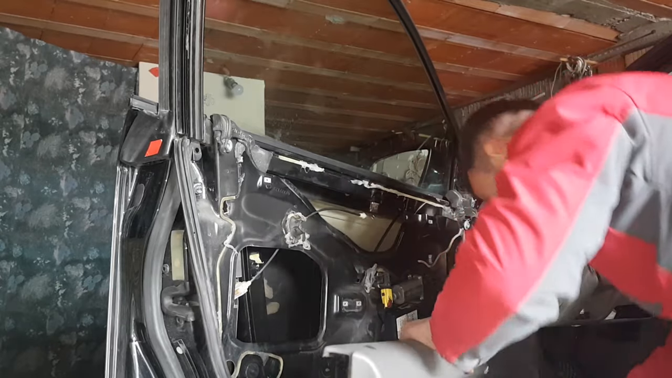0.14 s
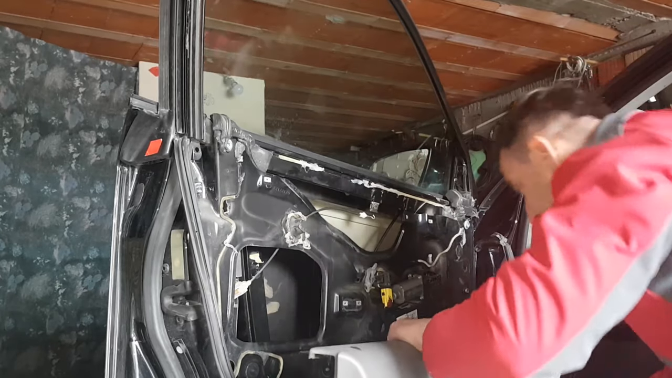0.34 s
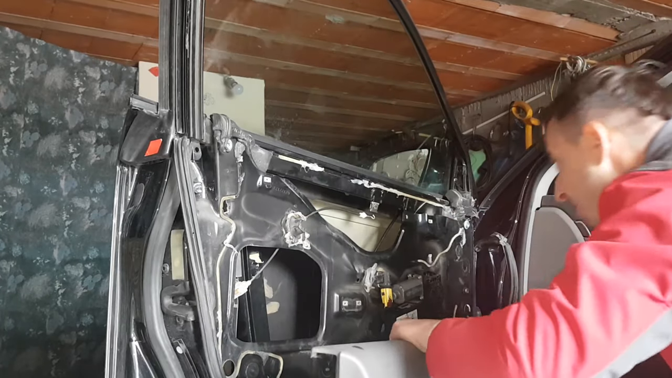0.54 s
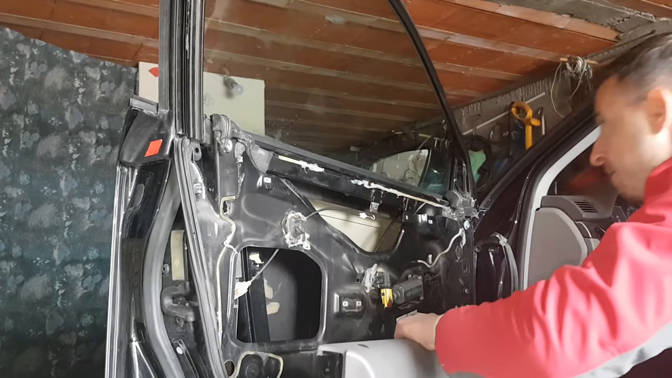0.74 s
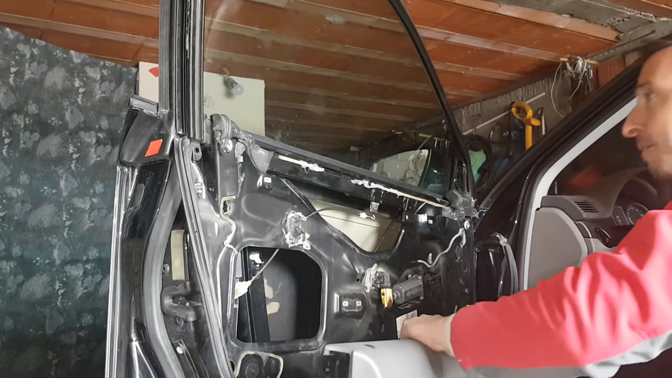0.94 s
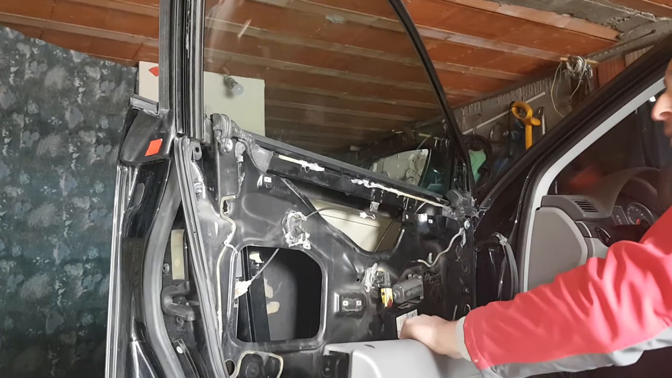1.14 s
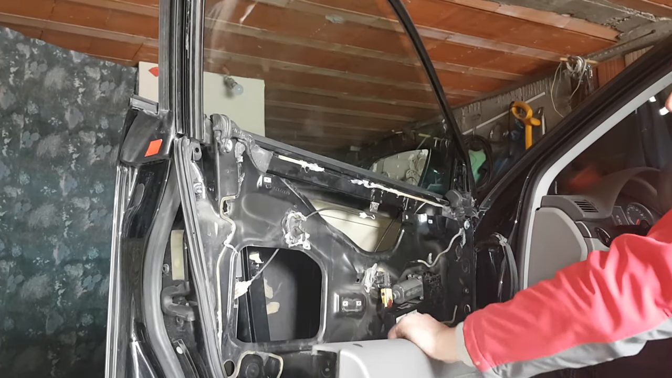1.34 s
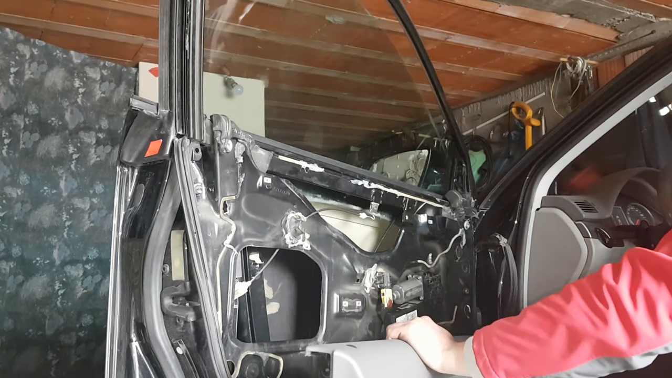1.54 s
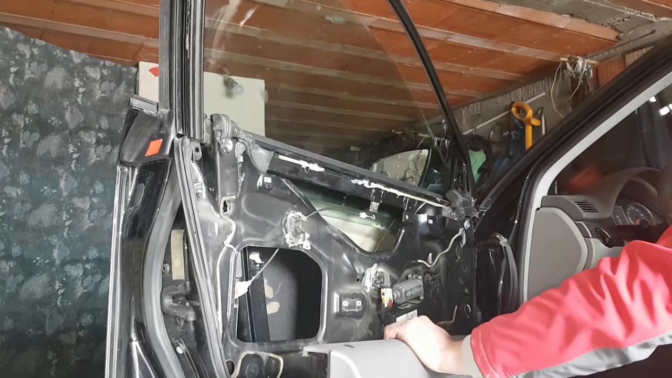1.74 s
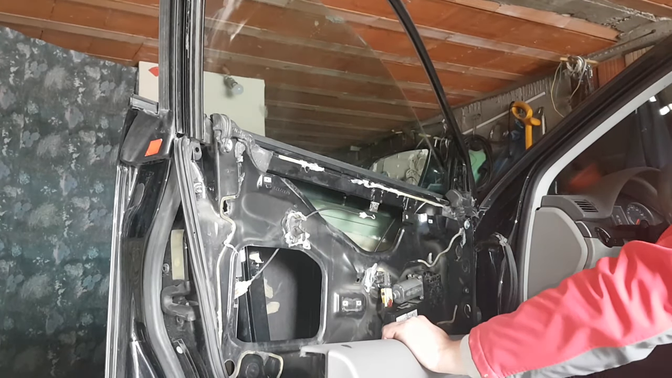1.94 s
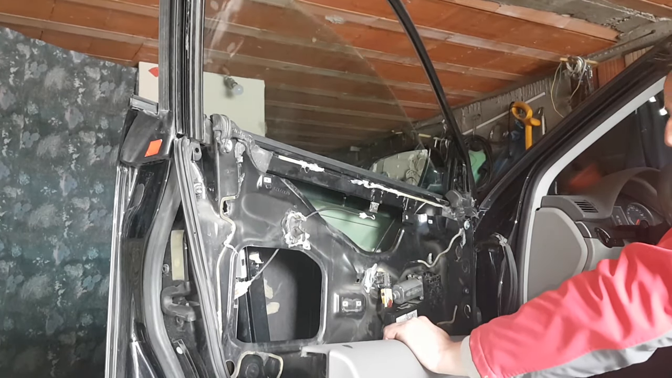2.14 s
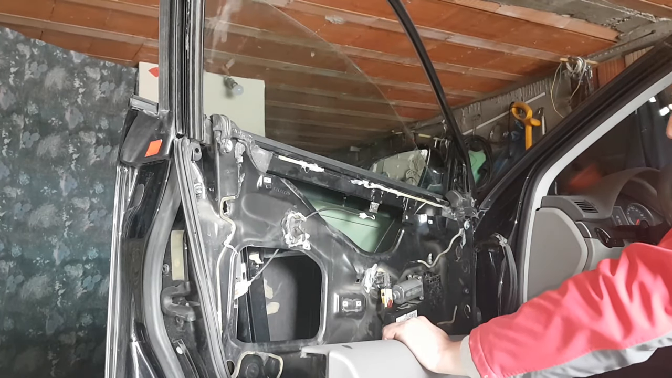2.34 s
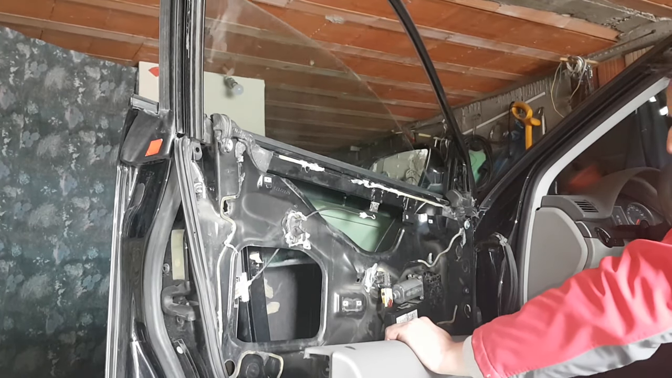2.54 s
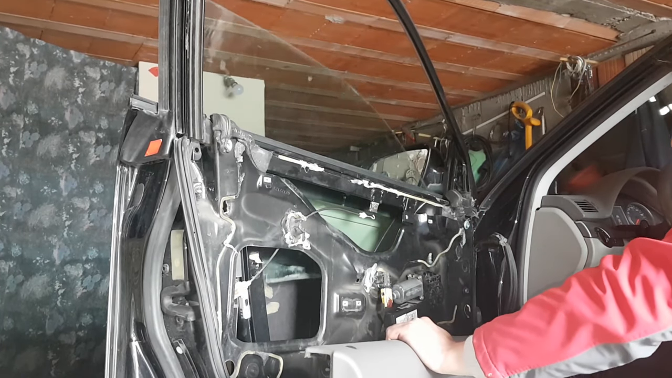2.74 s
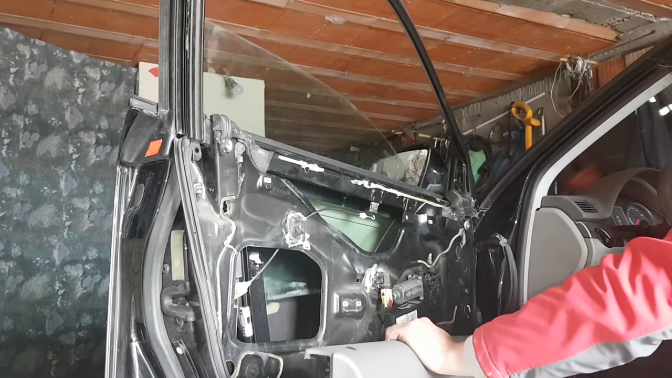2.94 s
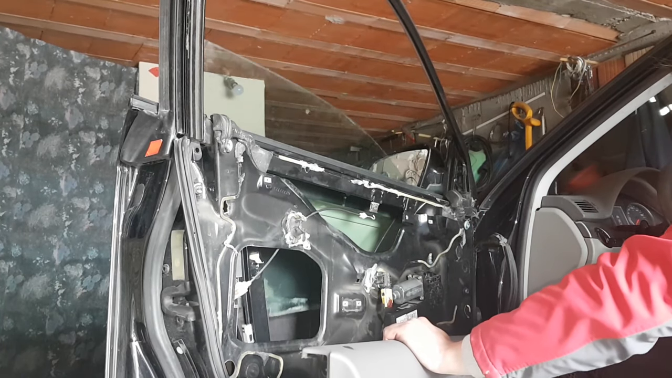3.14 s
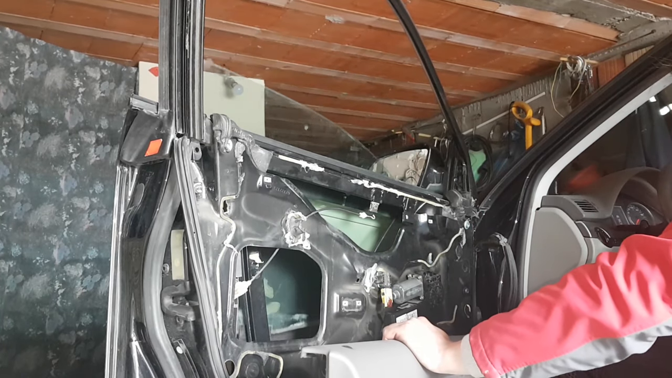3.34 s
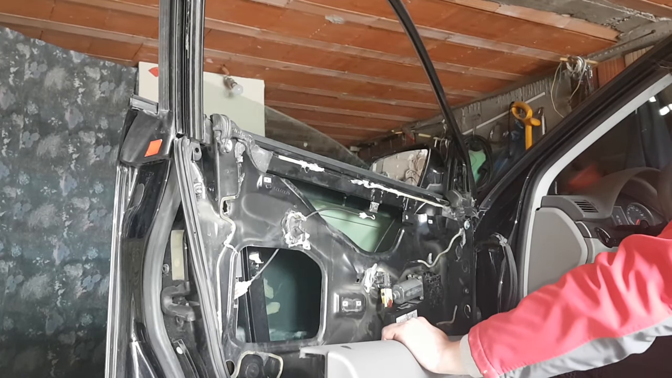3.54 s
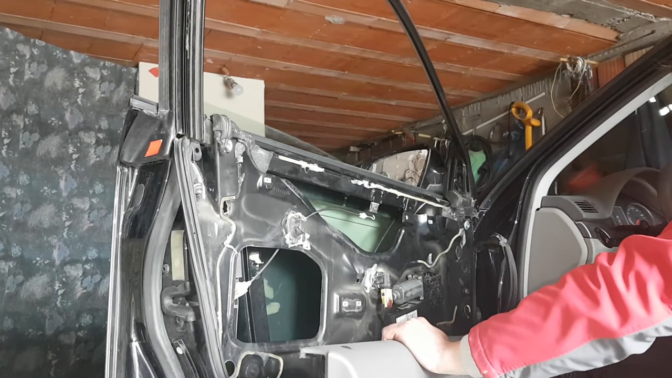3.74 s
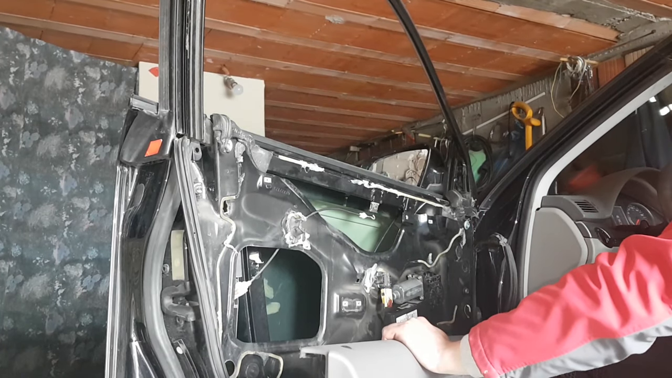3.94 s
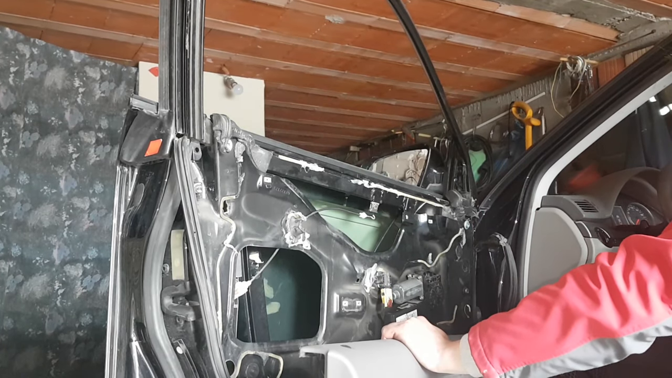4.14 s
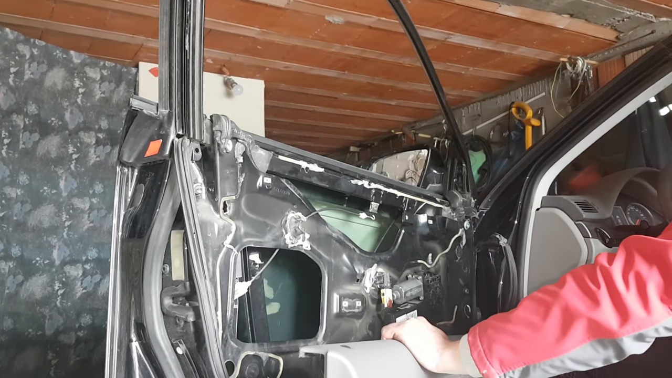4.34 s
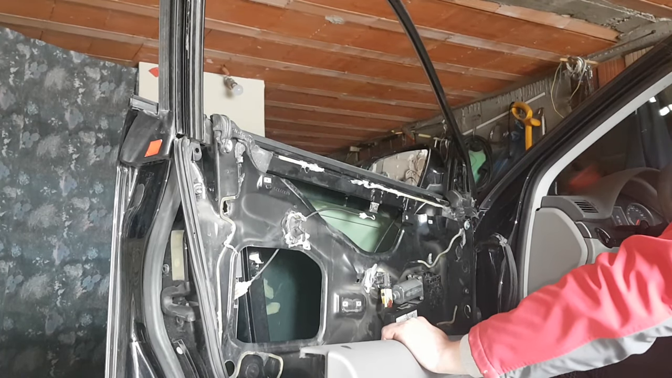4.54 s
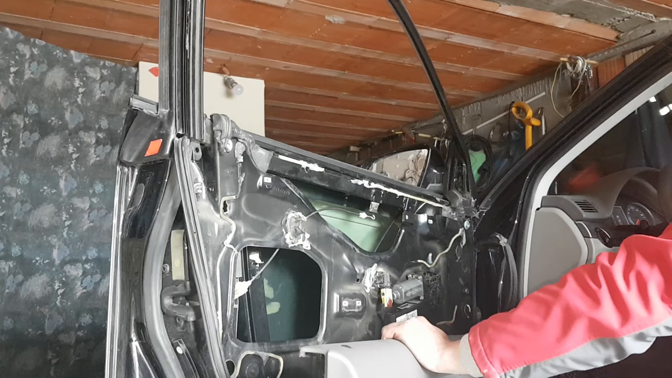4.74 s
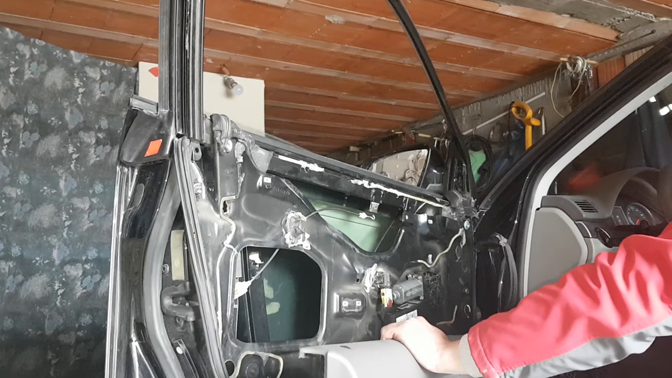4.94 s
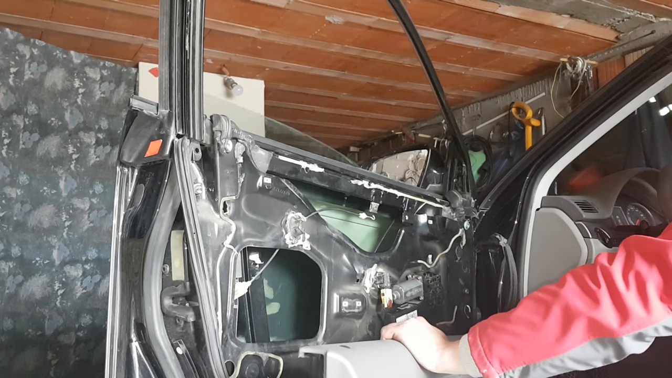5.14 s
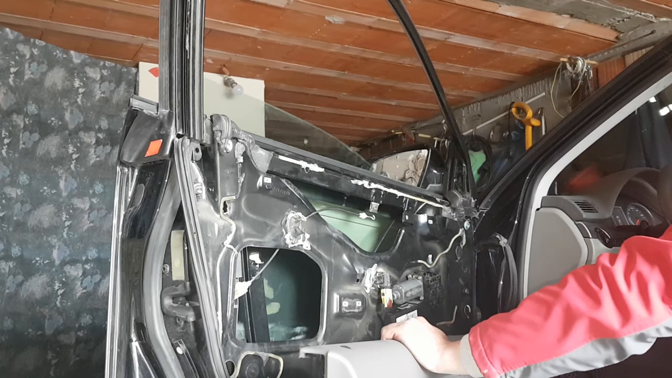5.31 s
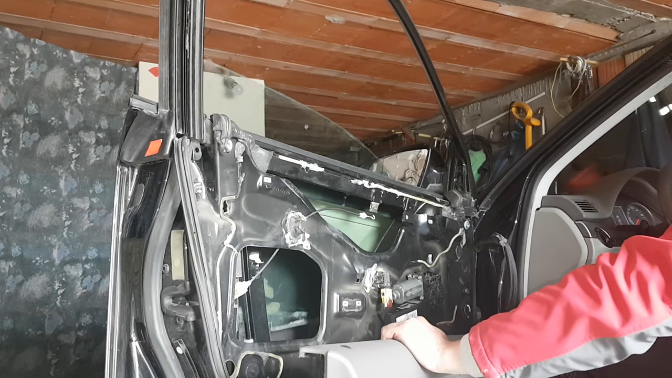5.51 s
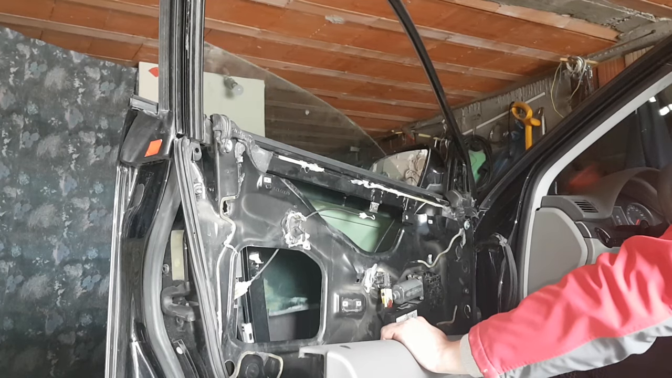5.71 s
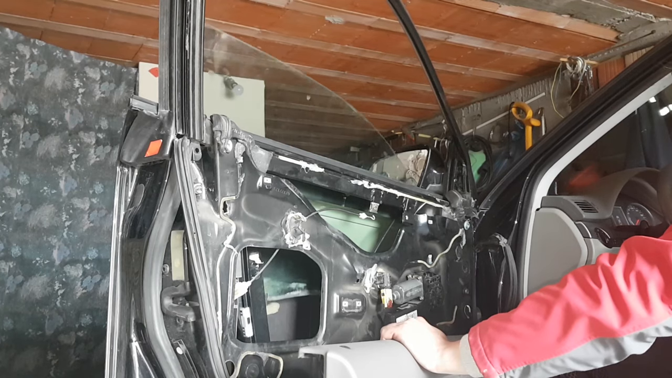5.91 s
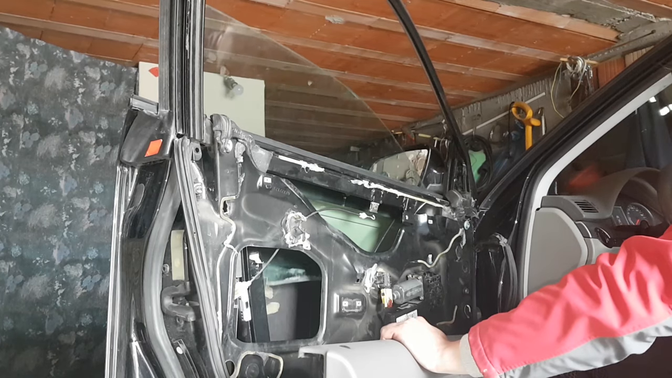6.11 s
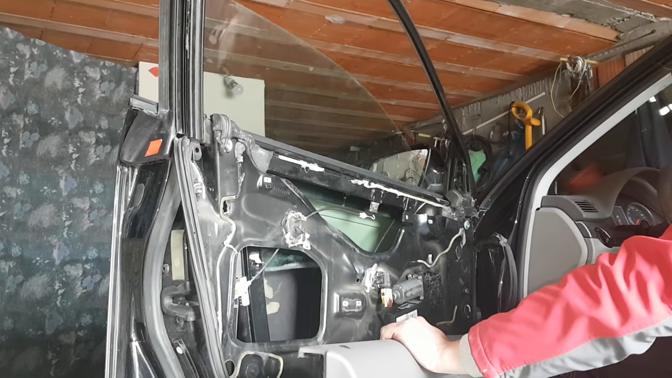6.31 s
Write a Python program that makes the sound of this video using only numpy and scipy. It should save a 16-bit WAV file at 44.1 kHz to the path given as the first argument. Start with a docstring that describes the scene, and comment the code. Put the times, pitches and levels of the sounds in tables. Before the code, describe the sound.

Close stereo pickup in a quiet garage. Cloth rustles and a hand knocks a hollow plastic switch panel. A window motor starts with a thump and the glass judders from its seal. The whirring whine rises through two downward runs, briefly interrupted, ending in a low door clunk. After a pause and small clicks, a sharp knock begins the climb, its whine gradually sinking.

```python
"""Power window in a stripped car door

In a garage a sleeve rustles (grainy filtered noise) and a hand lands on the switch panel (struck modes).
The glass judders out of its seal by stick and slip and goes down in two runs, dragging as rubbed modes.
The motor's whine follows its commutator rate, rising with speed, over the scrape and hiss of brushes.
The bottom stop clunks and rings the door; then the glass climbs again, slowing under the load."""
import sys
import numpy as np
from scipy import signal
from scipy.fft import rfft, irfft, next_fast_len
from scipy.io import wavfile
from scipy.ndimage import uniform_filter1d

SR = 44100
rng = np.random.default_rng(int(sys.argv[2]) if len(sys.argv) > 2 else 0)


def store_wav(level_fs):
    """Save 16-bit WAV to argv[1]."""
    pcm = np.round(np.clip(np.atleast_2d(level_fs), -1, 1) * 32767)
    wavfile.write(sys.argv[1], SR, pcm.T.astype(np.int16))


N = 285327
TIME = np.arange(N) / SR  # s

# runs of the motor, down, down and up:
# start_s, stop_s, kick_db, whirr_db at the start, drift_db_per_s, slide_db before the glass trim
RUNS = [(.8, 2.379, -46.5, -52.5, -1.5, -52.5), (2.454, 3.99, -50, -55, 1.5, -51),
        (4.713, 6.47, -51, -55, 0, -51.3)]
# speed within each run: time_s, commutator_hz before jitter
FIRST_DOWN_SPEED = [(1.08, 405), (1.115, 427.7), (1.19, 513.2), (1.31, 596), (1.49, 633), (1.7, 698),
                    (2.08, 720.6), (2.3, 738.3), (2.385, 754)]
SECOND_DOWN_SPEED = [(2.5, 692), (2.56, 733), (2.66, 741.3), (3.0, 784.2), (3.28, 811), (3.63, 849),
                     (3.98, 920.6)]
CLIMB_SPEED = [(4.9, 805), (5.2, 771), (5.5, 750), (5.8, 736), (6.08, 706), (6.3, 692)]
# relative spectrum of the motor's whirr each way: frequency_hz, level_db
WHIRR_DOWN = [(30, -13), (250, 4), (650, 5), (1100, -0.5), (1750, 0.5), (2300, -4), (2600, -1.5),
              (3800, -7.5), (5500, -8), (7500, -13), (9500, -16), (14000, -13), (16000, -17)]
WHIRR_UP = [(30, -32), (250, -2), (700, 1), (1200, -2.5), (1900, 1.5), (2300, -5.5), (2600, -3), (3600, -9),
            (5500, -11.5), (7500, -17), (9500, -18.5), (14000, -16), (16000, -18)]
# prominent shaft orders each way: multiple of the shaft rate, level_db before the order trim
ORDERS_DOWN = [(22, 6), (25, 6.5), (27, 5), (28, 9.5), (29, 5), (42, 6), (44, 6), (46, 7), (49, 6),
               (50, 8.5), (70, 7), (100, 11), (160, 10), (180, 10)]
ORDERS_UP = [(22, 5), (25, 4), (28, 8), (29, 4), (50, 9), (60, 6)]
COMMUTATOR_BARS = 10
# resonances of the motor can: frequency_hz, width_hz, lift_db
CAN_MODES = [(1730, 90, 5), (1950, 60, 4), (2230, 130, 7.5), (3520, 100, 3.5), (3810, 160, 8),
             (4520, 250, 7), (7750, 500, 8), (11800, 500, 4), (14000, 900, 6)]
# how well the door radiates the whine, and its octave: frequency_hz, level_db before the lifts below
WHINE_RADIATION = [(405, -52), (425, -37.5), (465, -50), (535, -43), (610, -46), (645, -40.5), (700, -47.5),
                   (735, -56.5), (752, -47), (785, -46.5), (812, -54), (830, -48), (905, -46.5)]
OCTAVE_RADIATION = [(850, -77), (1200, -60), (1380, -68), (1415, -65), (1470, -75), (1570, -70.5),
                    (1660, -82), (1790, -60.5)]
# lifts of the whine each way: whine_db, octave_db, whine_fade_db_per_s
LIFTS_DOWN = (0, 0, 0)
LIFTS_UP = (-1.5, 8, 8.5)
# scrape against hiss at the nominal commutator rate; it grows with speed
SCRAPE_DB, SCRAPE_DB_PER_OCTAVE, NOMINAL_HZ = -0.5, 16, 824

# modes of the door with its glass: frequency_hz, struck_db, t60_s when struck, rubbed_db
DOOR_MODES = [(71, -17, 0.73, -0.5), (131.8, -21, 0.37, -2.5), (155.2, 4, 0.17, 1.5), (221, 1.5, 0.094, -5),
              (255.7, 5, 0.11, 3.5), (367.4, 0, 0.1, -1), (420, -0.5, .18, -1), (466, -27, 0.056, -31),
              (544, -4, 0.11, -8), (655, 4, 0.056, -2.5), (762, -3, 0.15, -8), (902, -32, 0.6, -9.5),
              (1030, -17, 0.16, -14)]
# dense ring of sheet metal and garage: frequency_hz, t60_s
DENSE_RING = [(80, 0.94), (300, 0.41), (1000, 0.2), (2500, 0.19), (6000, 0.22), (14000, 0.12)]
# how strongly a blow feeds the dense ring: frequency_hz, level_db
SHEET_FEED = [(50, -24), (100, -18), (160, -6), (400, 0), (800, 1), (1200, -1), (2000, -4), (4000, -12),
              (8000, -18), (15000, -18)]
SLIDE_RISE_S, SLIDE_FALL_S = 0.018, 0.055  # the glass gets going and comes to rest
# glass tearing out of the seal: time_s, level_db, mean slip_rate_hz
JUDDER = [(.8, -67, 178), (.82, -35, 155), (.85, -32.5, 110), (.88, -35.5, 127), (.92, -44, 130),
          (.965, -42.5, 182), (1.02, -48, 98)]

# edges of the thump, knock, clack and tick bands: frequency_hz
BAND_EDGES_HZ = [62, 300, 1150, 4500, 16000]
# kinds of blow, levels relative to each event:
# thump_db, knock_db, clack_db, tick_db, hold_s, damping_s (time constant)
KICK = (-4, -1, -2, -7, .004, .05)
THUD = (0, -0.5, -16, -31, 0.12, .4)
KNOCK = (-13, 0, -12.5, -38, 0.0045, .3)
CLACK = (-15, -3, 0, -20, 0.0752, .06)
TICK = (-22, -6, -3, 0, 0.1037, .045)
# soft thuds of the hand and of the pane shifting in its runs: time_s, level_db
THUDS = [(.148, -37.5), (.364, -55), (1.238, -52), (1.72, -61.5), (2.096, -50), (2.471, -42), (2.49, -49.5),
         (4.88, -44)]
# knocks as the gear takes up or drops its load, and the hand pressing home: time_s, level_db
KNOCKS = [(.164, -34.5), (.872, -30), (2.354, -43.5), (4.778, -41.5), (4.788, -26.5), (4.836, -34.5)]
# the pane chattering in its frame: time_s, level_db
CLACKS = [(.897, -45), (.939, -41.5), (1.004, -41), (4.039, -50), (4.837, -47)]
# light ticks of plastic: time_s, level_db
TICKS = [(.111, -44.5), (.128, -45), (.626, -60), (1.004, -53), (2.452, -55), (4.039, -57), (4.134, -65),
         (4.628, -59.5), (4.712, -59)]
STOP_S = 3.987  # the carrier reaches the bottom stop
# first contact, full blow and the door's rebound:
# delay_s, thump_db, knock_db, clack_db, tick_db, hold_s, damping_s (time constant)
STOP_STAGES = [(0, -56, -34, -41.5, -62, .01, .05), (.007, -23.5, -26, -39.5, -54, .014, .6),
               (.031, -22, -48, -69, -59, .013, .9)]

# the rocker switch touched by the landing hand, then let go twice: time_s, snap_db, tick_db
SWITCH_CLICKS = [(.167, -46.5, -39), (2.353, -46.5, -50), (4.203, -45, -48.5)]
# colour of its hollow panel: frequency_hz, level_db
PANEL = [(200, 2), (500, -1), (680, 10.5), (1040, 6), (1400, 3.5), (1650, 0.5), (2400, -15.5), (2850, -5.5),
         (5000, -27), (16000, -14)]
# strokes of the sleeve, and its faint drag in between: start_s, length_s, level_db
STROKES = [(-.02, .088, -44), (.084, 0.047, -36.8), (.2, .59, -66), (.345, .045, -63), (.49, .08, -66),
           (.56, 0.088, -62)]
STROKE_RISE_S, STROKE_FALL_S = 0.026, 0.018  # each stroke swells and dies away
# relative spectrum of the cloth: frequency_hz, level_db
CLOTH = [(59, -45), (100, -7), (224, -7), (276, -2), (388, -9), (460, 1), (631, -6), (702, 0.5),
         (886, -4.5), (1400, -8), (3990, -7), (15800, -26.5)]
# short squeaks of the glass: time_s, pitch_hz, level_db, half_length_s
SQUEAKS = [(.27, 3300, -58, .013), (4.83, 4700, -57, .018)]
# relative spectrum of the still garage: frequency_hz, level_db
AIR = [(15, -43), (25, 2.5), (59, 0), (184, -9), (241, -11.5), (342, -13.5), (691, -17.5), (834, -20),
       (3130, -29), (5820, -38.5), (15800, -34.5)]
AIR_DB = -63.5
# side against mid: frequency_hz, gain_db
WIDTH = [(200, -16), (500, -11.5), (1000, -3.5), (4000, -1.5), (9000, 1.5)]
CUT_HZ = 15900  # upper band limit


def amp(db):
    """Amplitude ratio: 20 dB is a factor of ten."""
    return 10 ** (np.asarray(db) / 20)


def unit(x):
    """Normalization: each channel is scaled to rms 1."""
    return x / np.sqrt(np.mean(x ** 2, axis=-1, keepdims=True) + 1e-20)


def read(points, hz):
    """Interpolation of a table on a logarithmic frequency axis."""
    f, value = np.transpose(points)
    return np.interp(np.log(hz + 1), np.log(f + 1), value)


def colour(x, points):
    """Linear filtering: the spectrum is multiplied by a gain curve in dB."""
    length = x.shape[-1]
    size = next_fast_len(length + 2048)
    gain = amp(read(points, np.fft.rfftfreq(size, 1 / SR)))
    return irfft(rfft(x, size) * gain, size)[..., :length]


def curve(rows, axis):
    """Interpolation in time of one table column."""
    rows = np.array(rows)
    return np.interp(TIME, rows[:, 0], rows[:, axis])


def gate(on, off, rise, fall):
    """Envelope: a linear onset, then exponential decay after off."""
    return np.clip((TIME - on) / rise, 0, 1) * np.exp(-np.maximum(TIME - off, 0) / fall)


def wander(hz):
    """Random modulation of rms 1: straight lines join hz new random values a second."""
    return unit(np.interp(TIME * hz, np.arange(N), rng.standard_normal(N)))


def add(mix, s, sound):
    """Superposition: a sound is summed into the mix from s seconds on."""
    part = mix[:, round(s * SR):][:, :sound.shape[1]]
    part += sound[:, :part.shape[1]]


def motor(run, speed, whirr, orders, lifts_db, jitter=0.000688, grit=0.073, coast=0.016,
          flutter=0.21, waver_db=2.2):
    """Commutation: bars passing the brushes whine at their rate, over brush scrape and hiss."""
    on, off, _, whirr_db, drift_db, _ = run
    since_on = TIME - on
    hz = curve(speed, axis=1)
    turns = np.cumsum(hz * (1 + jitter * wander(70))) / SR / COMMUTATOR_BARS
    phase = 2 * np.pi * COMMUTATOR_BARS * turns

    # the whine swells and fades as it glides through the door's radiation curve
    whine_db, octave_db, fade_db = lifts_db
    whine = amp(read(WHINE_RADIATION, hz) + whine_db - fade_db * since_on) * np.sin(phase)
    whine += amp(read(OCTAVE_RADIATION, 2 * hz) + octave_db) * np.sin(2 * phase)
    whine *= gate(speed[0][0], off, 0.0092, coast)
    whine *= (1 + flutter * wander(80)) * amp(waver_db * wander(18))

    hiss = unit(rng.standard_normal((2, N)) * np.exp(grit * wander(700)))
    bite = amp(SCRAPE_DB + SCRAPE_DB_PER_OCTAVE * np.log2(hz / NOMINAL_HZ))
    brushes = (bite * scrape(turns, orders) + hiss) / np.hypot(bite, 1)  # a power-preserving blend
    body = unit(colour(brushes, whirr))
    body = body * amp(whirr_db + drift_db * since_on) * gate(on, off, 0.0013, coast)
    return body + np.array([whine, whine * wander(6.5)])


def scrape(turns, orders, bars_db=5, wet=0.94):
    """Periodicity: brushes and worm repeat one pattern each shaft turn, so they sound its harmonics."""
    heights = amp(2 * rng.standard_normal(220))
    heights[::COMMUTATOR_BARS] *= amp(bars_db)
    for order, db in orders:
        heights[order] = amp(db - 0.5)
    heights[0] = 0
    phases = np.exp(2j * np.pi * rng.random((2, len(heights))))
    patterns = irfft(heights * phases, 4096)
    direct = np.array([np.interp(turns % 1, np.linspace(0, 1, len(p)), p) for p in patterns])
    reverberant = unit(signal.oaconvolve(direct, ring(), axes=1)[:, :N])
    sound = unit(direct) + wet * reverberant
    lifted = sound
    for hz, width, db in CAN_MODES:
        b, a = signal.iirpeak(hz, hz / width, SR)
        lifted = lifted + (amp(db) - 1) * signal.lfilter(b, a, sound)
    return unit(lifted)


def glass(db=-2, lumpy_db=2.0):
    """Sliding friction: the pane drags in its felt runs and rumbles the door while the motor turns."""
    drag = 0
    for on, off, *_, slide_db in RUNS:
        drag = drag + amp(slide_db) * gate(on, off, SLIDE_RISE_S, SLIDE_FALL_S)
    return rubbed(rng.standard_normal((2, N))) * drag * amp(db + lumpy_db * wander(14))


def judder(uneven=0.12, rough=1.0):
    """Stick and slip: the glass leaves the top seal in small jumps that drive the door."""
    slip_hz = curve(JUDDER, axis=2) * (1 + uneven * wander(90))
    slips = np.diff(np.floor(np.cumsum(slip_hz) / SR), prepend=0)  # one impulse a slip
    drive = unit(slips) + rough * rng.standard_normal((2, N))
    sound = unit(colour(rubbed(drive), [(130, -1.0), (300, -1.0), (900, -12.0)]))
    return sound * amp(curve(JUDDER, axis=1)) * gate(JUDDER[0][0], JUDDER[-1][0], 0.0024, 0.022)


def rubbed(x, damping=1.53):
    """Forced vibration: a steady drive excites the door's modes, damped by the rubber seal."""
    out = 0
    for hz, _, t60, db in DOOR_MODES:
        quality = hz * t60 / (np.log(1000) / np.pi * damping)
        b, a = signal.iirpeak(hz, quality, SR)
        out = out + amp(db) * unit(signal.lfilter(b, a, x))
    return unit(out)


def blows():
    """Impulsive excitation: motor starts, hand, gear and pane strike the door, and the end stop clunks."""
    out = np.zeros((2, N))
    kicks = [(on, db) for on, _, db, *_ in RUNS]
    groups = [(KICK, kicks), (THUD, THUDS), (KNOCK, KNOCKS), (CLACK, CLACKS), (TICK, TICKS)]
    for kind, rows in groups:
        for s, db in rows:
            add(out, s, amp(db) * blow(kind))
    for delay, *stage in STOP_STAGES:
        add(out, STOP_S + delay, blow(stage))
    return out


def blow(kind, dense_db=-7, crack_db=7, crack_s=0.011, first_s=0.00907):
    """Free vibration: a blow rings the door's modes and dense sheet-metal tail, levelled band by band."""
    *levels, hold, damping_s = kind
    tail = colour(ring(hold), SHEET_FEED)
    t = np.arange(tail.shape[1]) / SR
    modes = sum(amp(db - 60 * t / t60) * np.cos(2 * np.pi * hz * t) for hz, db, t60, _ in DOOR_MODES)
    modes = modes * (1 - np.exp(-t / 0.002))  # soft contact
    struck = unit(modes) + amp(dense_db) * unit(tail) * (1 + amp(crack_db) * np.exp(-t / crack_s))
    struck = struck * np.exp(-t / damping_s)
    out = 0
    for lo, hi, db in zip(BAND_EDGES_HZ, BAND_EDGES_HZ[1:], levels):
        sos = signal.butter(3, [lo, hi], "band", fs=SR, output="sos")
        band = signal.sosfilt(sos, struck)
        out = out + amp(db) * band / band[0, t < first_s].std()  # level of the first moments
    return out


def ring(hold=0):
    """Reverberant decay: mid and side noise holds briefly, then each frequency dies at its own rate."""
    hz, t, z = signal.stft(rng.standard_normal((2, SR // 2)), SR, nperseg=256)
    decay_db = -60 * np.maximum(t - hold, 0) / read(DENSE_RING, hz)[:, None]
    return signal.istft(z * amp(decay_db), SR, nperseg=256)[1]


def switch(hold=0.0018, ring_s=0.055, tick_s=0.004):
    """Impulse response: the rocker is touched or let go with a tick and briefly rings its plastic panel."""
    out = np.zeros((2, N))
    for s, snap_db, tick_db in SWITCH_CLICKS:
        snap = colour(ring(hold), PANEL)
        t = np.arange(snap.shape[1]) / SR
        snap = snap * np.exp(-t / ring_s)
        tick = rng.standard_normal(snap.shape) * np.exp(-t / tick_s)
        add(out, s, amp(snap_db) * snap / snap[0, t < 0.025].std() + amp(tick_db) * tick)
    return out


def sleeve(grain=0.14, patchy_db=3, wet=0.18):
    """Granular friction: cloth rubs in small catches coloured by its folds; the garage answers."""
    catches = rng.standard_normal((2, N)) * np.exp(grain * wander(400))
    _, _, z = signal.stft(catches, SR, nperseg=512)
    folds = uniform_filter1d(rng.standard_normal(z.shape[1:]), size=8, axis=0)
    folds = unit(uniform_filter1d(folds, size=10, axis=1))
    rub = signal.istft(z * amp(patchy_db * folds), SR, nperseg=512)[1][:, :N]
    strokes = 0
    for s, length, db in STROKES:
        strokes = strokes + amp(db) * gate(s, s + length, STROKE_RISE_S, STROKE_FALL_S)
    rub = unit(colour(rub, CLOTH)) * strokes
    tail = ring()
    return rub + wet * signal.oaconvolve(rub, tail / np.linalg.norm(tail[0]), axes=1)[:, :N]


def squeaks():
    """Narrow-band noise: the glass squeaks in brief bursts, each about one pitch."""
    out = np.zeros((2, N))
    for s, hz, db, half_length in SQUEAKS:
        t = np.arange(-2 * half_length, 2 * half_length, 1 / SR)
        noise = rng.standard_normal((2, len(t)))
        band = unit(colour(noise, [(hz * 0.7, -45), (hz, 0), (hz * 1.4, -45)]))
        add(out, s + t[0], band * amp(db) * np.exp(-(t / half_length) ** 2))
    return out


def garage_air():
    """Stationary noise: the still garage is a steady hush weighted to the bass."""
    return amp(AIR_DB) * unit(colour(rng.standard_normal((2, N)), AIR))


def scene():
    """Superposition of all sources as mid and side; the bass is almost the same in both channels."""
    first, second, third = RUNS
    down = motor(first, FIRST_DOWN_SPEED, WHIRR_DOWN, ORDERS_DOWN, LIFTS_DOWN)
    down = down + motor(second, SECOND_DOWN_SPEED, WHIRR_DOWN, ORDERS_DOWN, LIFTS_DOWN)
    up = motor(third, CLIMB_SPEED, WHIRR_UP, ORDERS_UP, LIFTS_UP)
    door = glass() + judder() + blows()
    mid, side = down + up + door + switch() + sleeve() + squeaks() + garage_air()
    side = colour(side, WIDTH)
    return np.array([mid + side, mid - side])


def record(dry):
    """Channel response: the left has less bass and more top treble than the right; then a band limit."""
    left = colour(dry[0], [(200, -2.0), (1000, -1.0), (2000, 0.3), (5000, -1.6), (13000, -0.3)])
    right = colour(dry[1], [(200, 0.34), (1000, -1.33), (2000, 1.06), (5000, -2.2), (13000, -1.7)])
    lowpass = signal.firwin(511, CUT_HZ, window=("kaiser", 9), fs=SR)
    return signal.oaconvolve(np.array([left, right]), lowpass[None], "same", axes=1)


dry = scene()
out = record(dry)
store_wav(out)
```